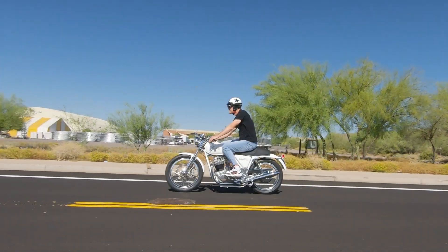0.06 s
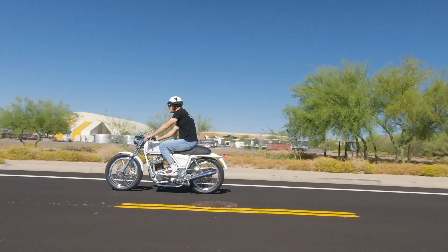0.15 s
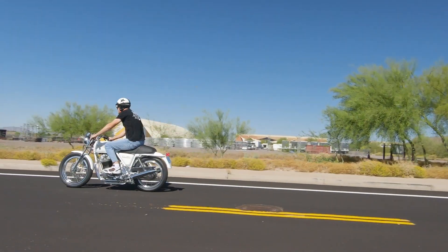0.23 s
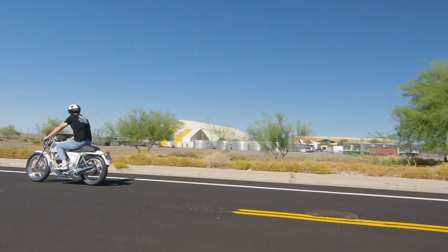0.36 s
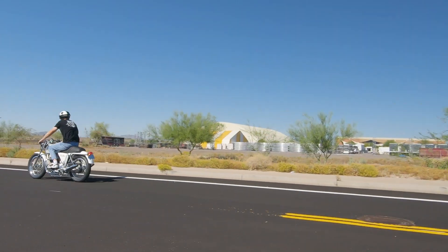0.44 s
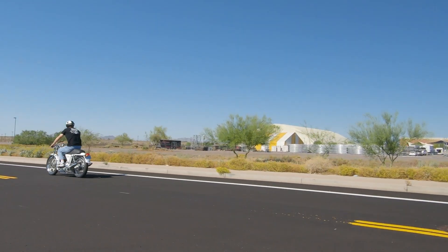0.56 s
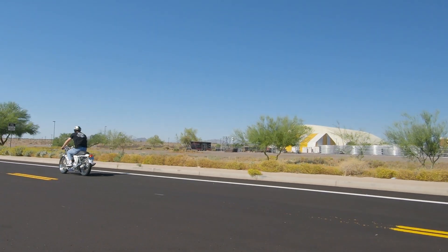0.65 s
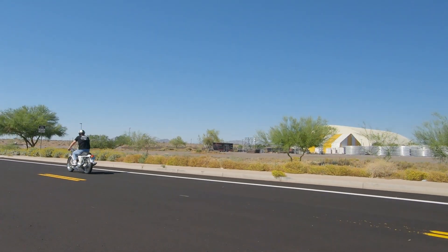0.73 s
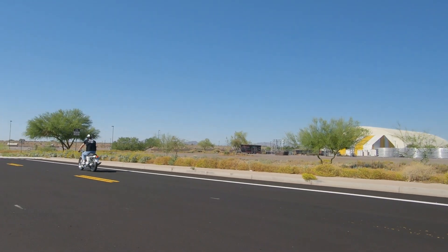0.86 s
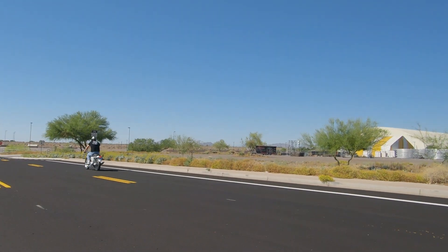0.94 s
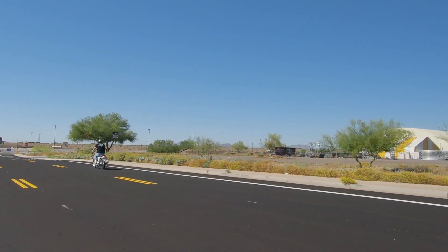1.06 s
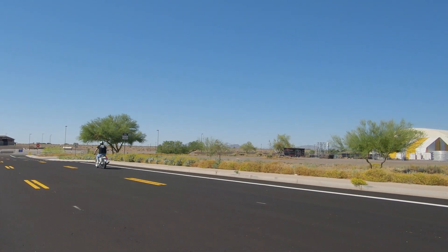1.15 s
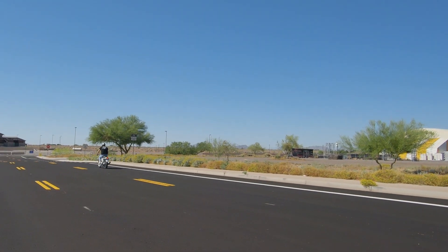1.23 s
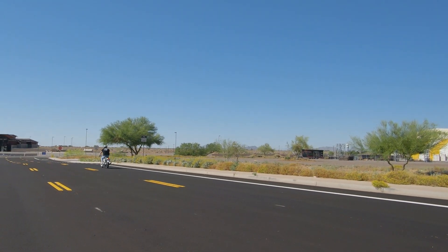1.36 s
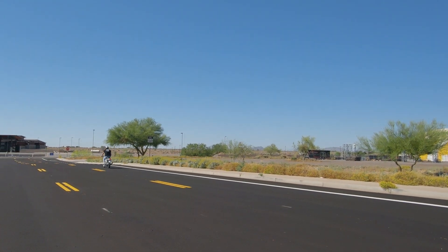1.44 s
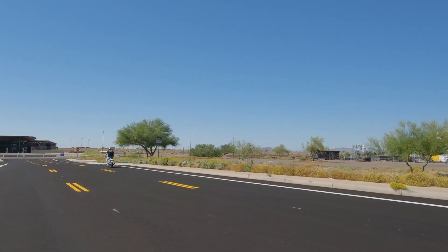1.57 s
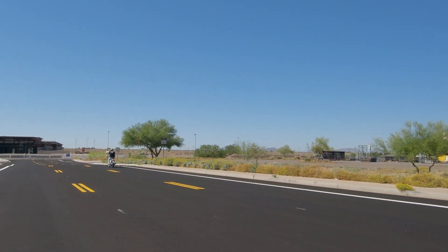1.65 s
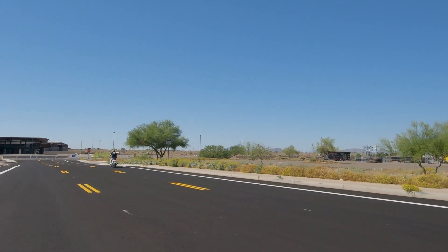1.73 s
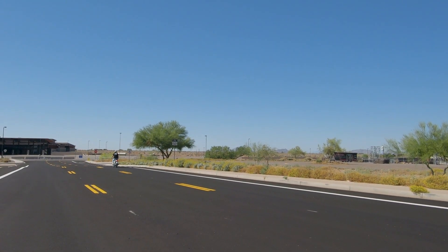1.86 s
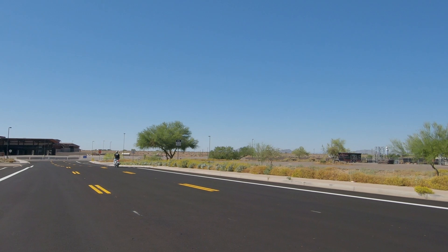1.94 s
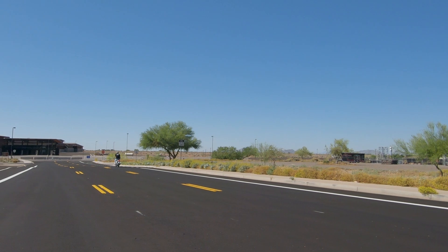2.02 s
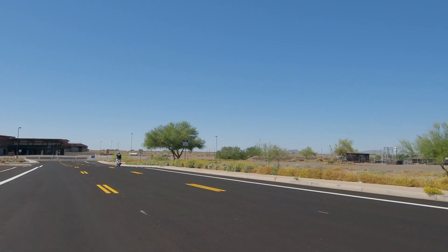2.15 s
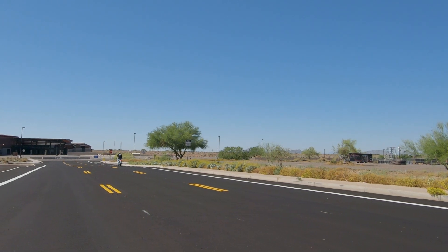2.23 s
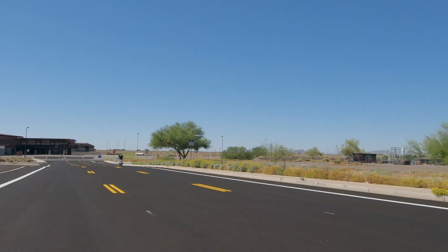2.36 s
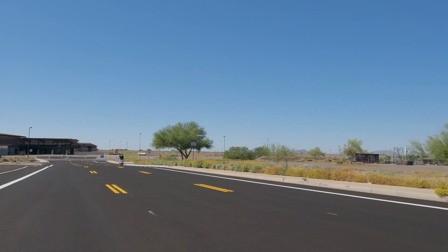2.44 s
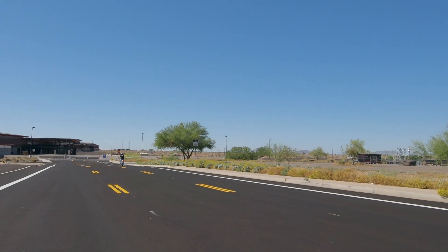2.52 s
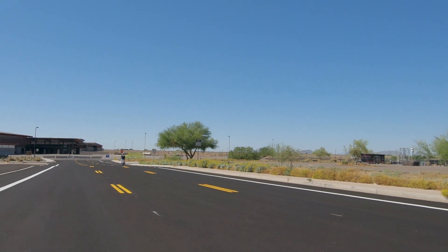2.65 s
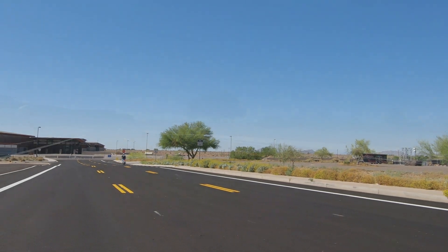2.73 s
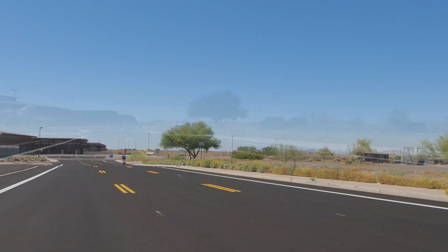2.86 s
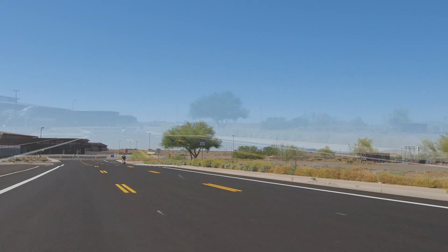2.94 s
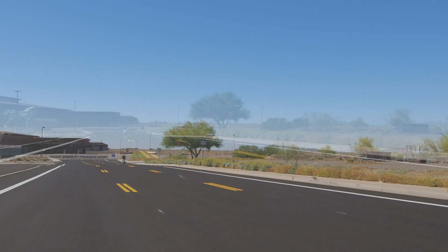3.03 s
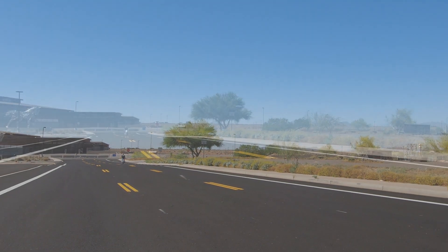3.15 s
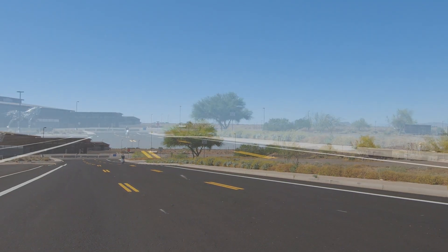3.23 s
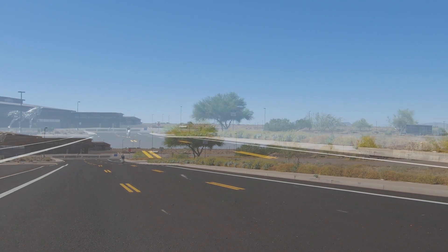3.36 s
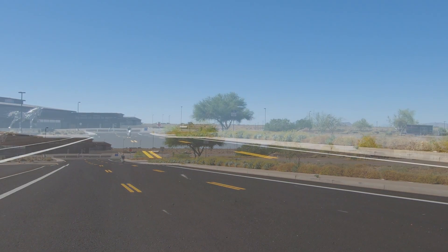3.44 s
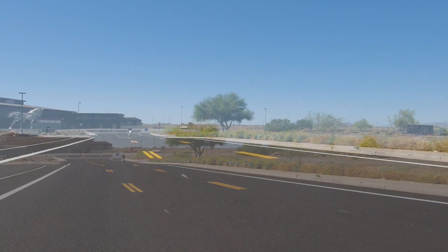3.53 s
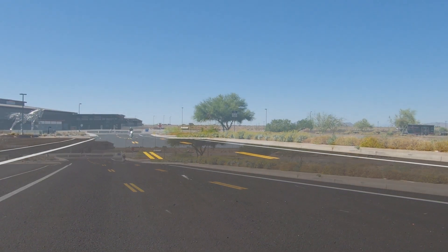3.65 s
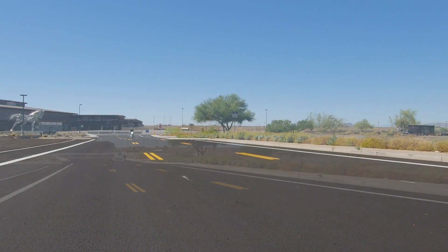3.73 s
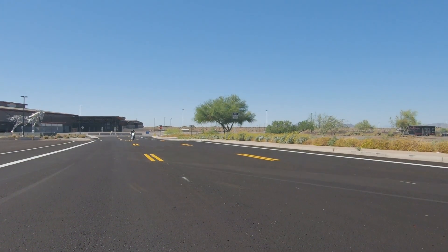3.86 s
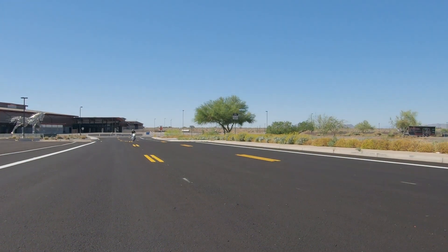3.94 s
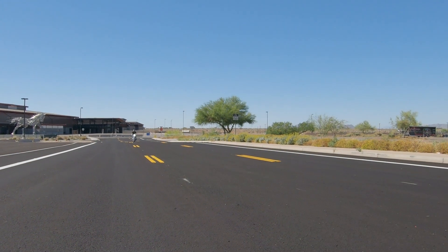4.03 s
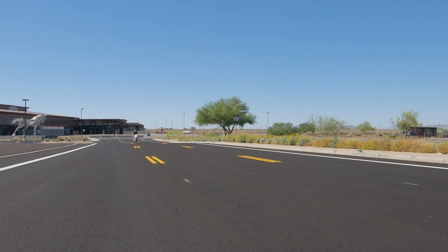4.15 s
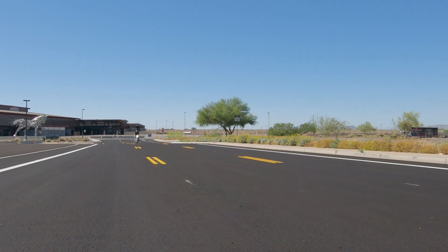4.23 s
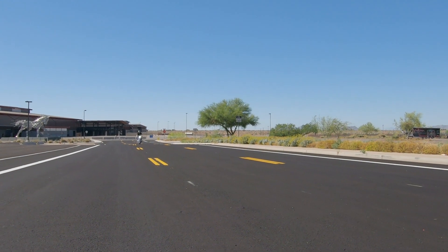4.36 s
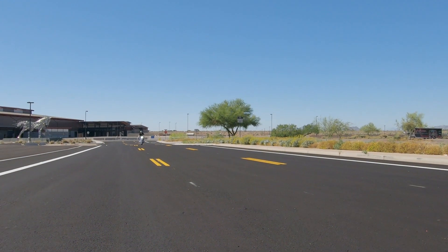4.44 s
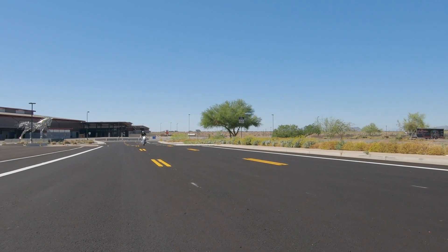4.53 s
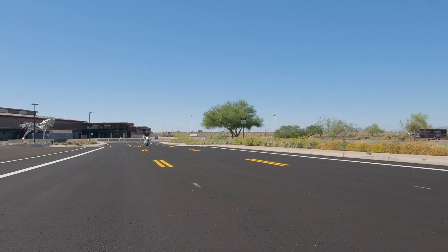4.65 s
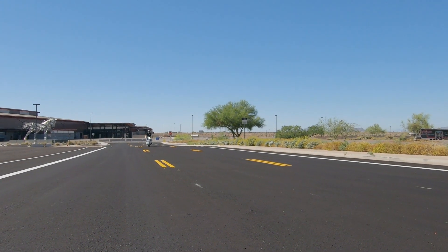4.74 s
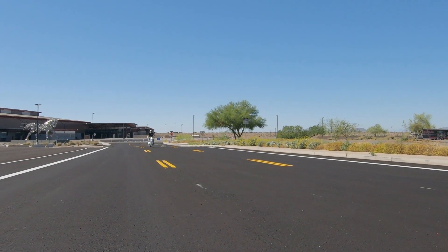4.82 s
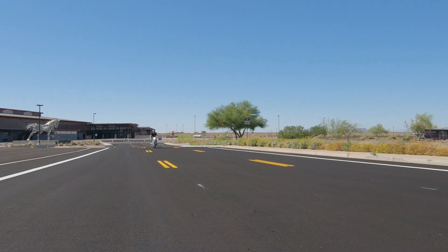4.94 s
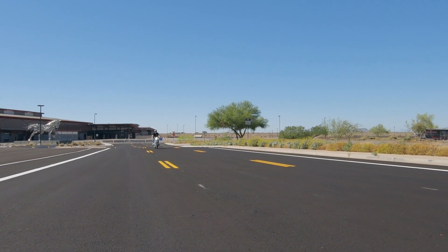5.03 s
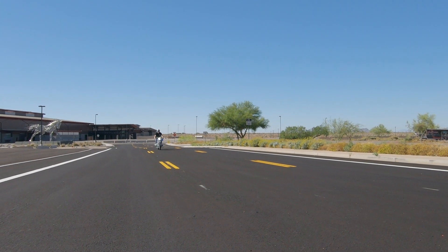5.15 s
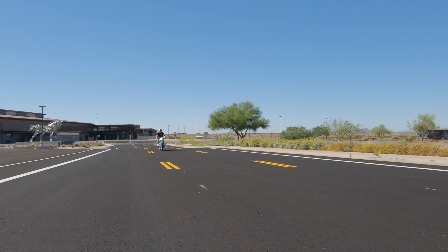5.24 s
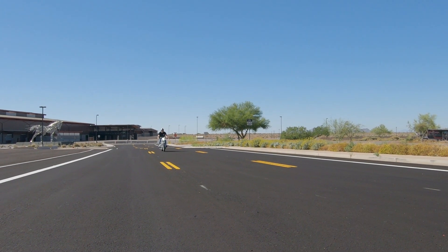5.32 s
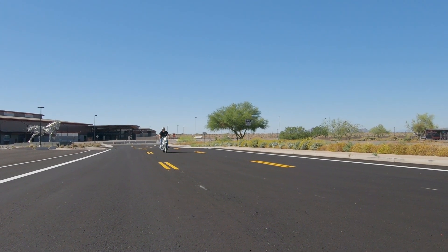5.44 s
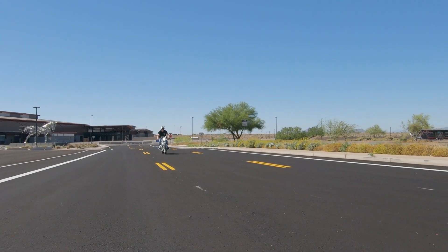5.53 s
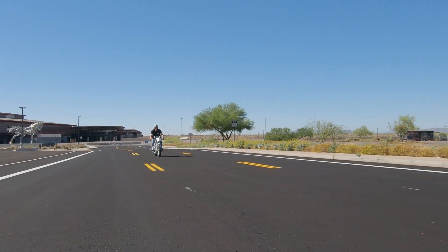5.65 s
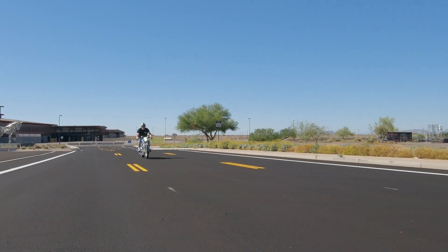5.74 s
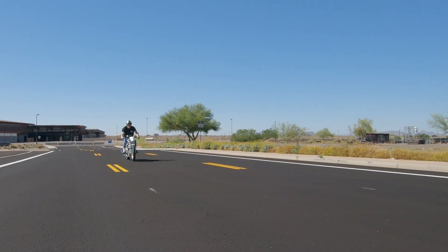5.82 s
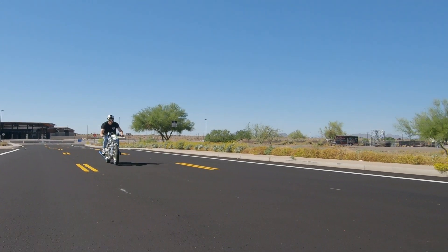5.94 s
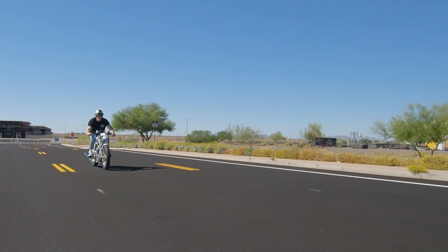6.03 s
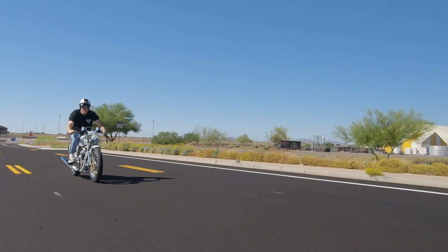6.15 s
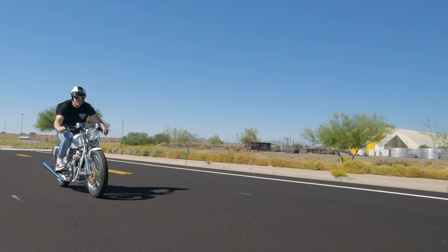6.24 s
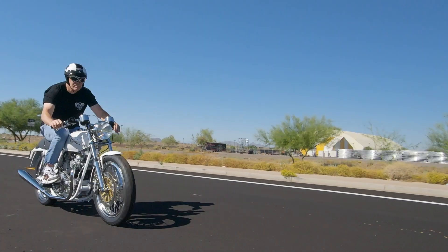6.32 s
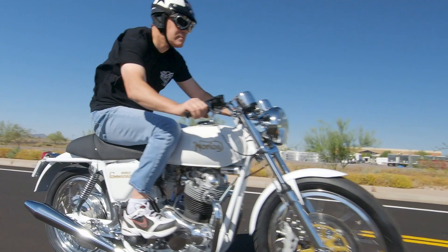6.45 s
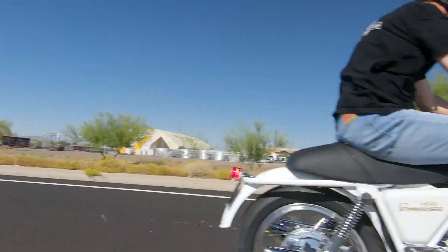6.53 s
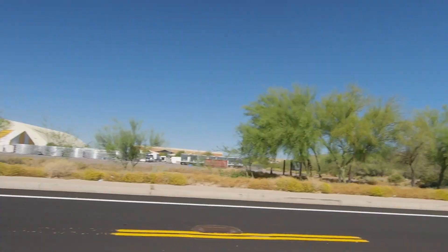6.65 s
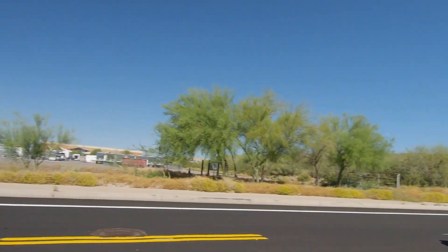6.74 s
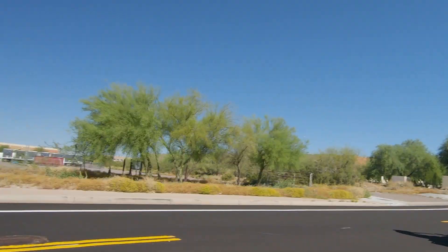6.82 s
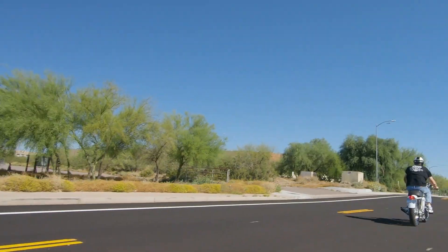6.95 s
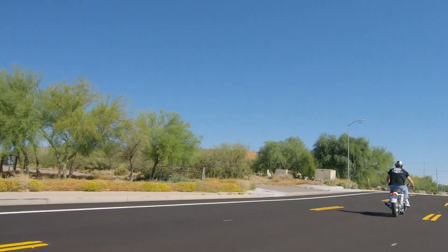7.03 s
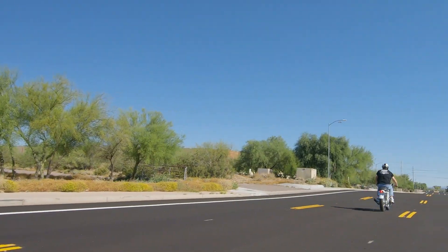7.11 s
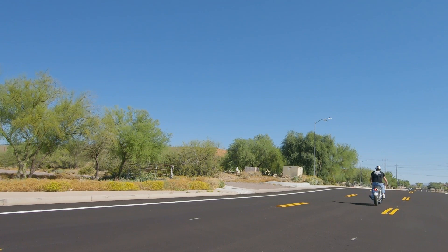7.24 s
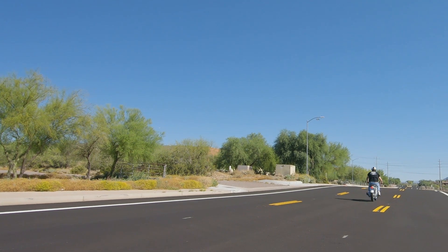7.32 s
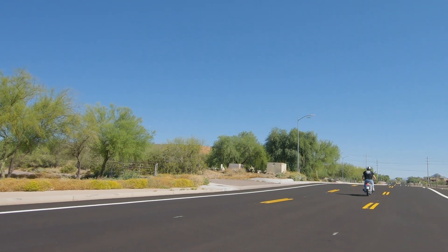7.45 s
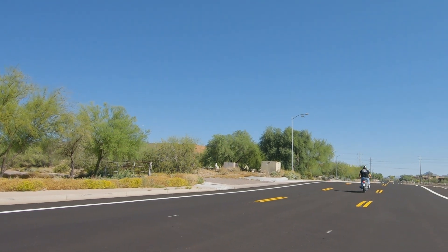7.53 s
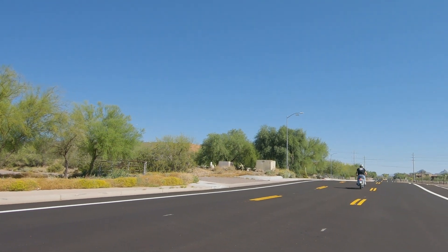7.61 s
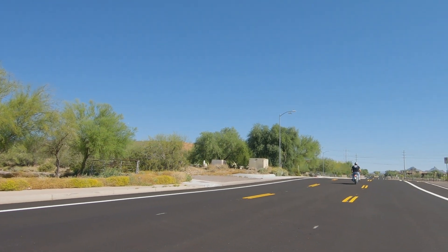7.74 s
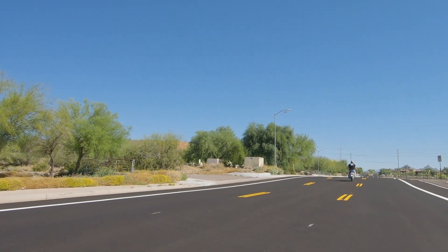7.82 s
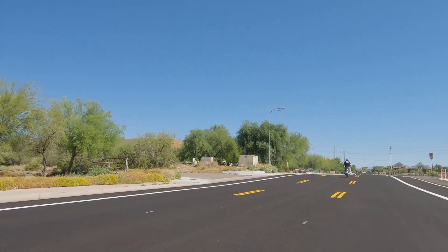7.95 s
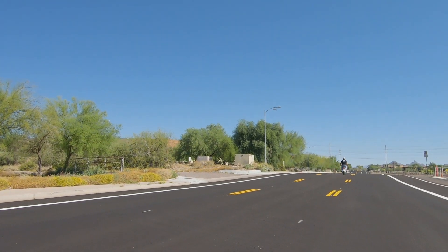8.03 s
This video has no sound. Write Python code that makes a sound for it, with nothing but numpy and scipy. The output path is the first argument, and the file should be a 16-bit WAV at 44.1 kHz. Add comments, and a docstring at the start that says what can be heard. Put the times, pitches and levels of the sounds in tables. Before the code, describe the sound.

A twin-cylinder motorcycle is already passing at 0 s, a raspy open-throttle growl a few metres from the roadside microphone. At about 0.4 s the throttle shuts and it coasts away, a dull, uneven putter quickly thinning, with a small pop at 1.5 s, a cluster of muffled backfires around 1.9-2 s and a brief throttle blip at 2.3-2.6 s. Between 3 and 3.65 s this crossfades into a return run: faint late pops at 3.3 s, then a hard pull with smoothly climbing pitch until 4.8 s. A short gear-change dip follows; from 5 s it pulls again, swelling fast. At 6.6 s it blasts past very close, clipped and tearing, with a thump of wake wind and a Doppler drop. Throttle shuts at 7.1 s, a bang at 7.46 s, then a lower pull recedes to 8 s amid faint open-air hush and light breeze buffeting.

```python
"""A twin-cylinder motorcycle growls past on an open road, shuts its throttle and coasts away, popping.
Its coasting fades into a run back: it pulls hard, changes up, passes close enough to overload the
recorder, changes up again and cruises off. Alternating firings ring through the silencers as the note;
the same firings pulse noise as tearing gas. Late burns bang, and wake and breeze buffet the microphone."""
import sys
import numpy as np
from scipy import signal
from scipy.fft import rfft, irfft, next_fast_len
from scipy.io import wavfile
from scipy.ndimage import uniform_filter1d, map_coordinates

SR = 44100
rng = np.random.default_rng(int(sys.argv[2]) if len(sys.argv) > 2 else 0)


def generate_wav(signal):
    """Clip the signal to [-1, 1] and save it as 16-bit WAV at the path in sys.argv[1]."""
    frames = np.transpose(np.atleast_2d(signal))
    scaled = np.clip(frames, -1, 1) * 32767
    pcm = np.round(scaled).astype(np.int16)
    wavfile.write(sys.argv[1], SR, pcm)


N = 356322
RIDE_M_PER_S, SOUND_M_PER_S = 14, 343

# edges between boom, bark, rasp and fizz [edge_hz]
BAND_EDGES = (300, 2000, 6500)
JET_WIDTH_M, JET_REACH_M = 3.93, 15  # the zone behind the silencers where single blasts stand out
JET_DB = 0.5  # extra level there, weighted by 1.5 less the side-on share
CRACKLE_DEPTH = 0.97  # most that the ticks add to the treble


def motorcycle(distance_m, heading, offset_m):
    """Note and rasp split into four bands, each fading with distance at its own rate."""
    near, far = both_runs()
    throttle = throttle_opening()
    facing = np.clip(heading, 0, 1) ** 2 * 0.79
    # the microphone stands in the jet when close behind the silencers and near their line
    leaving = np.clip(-1.7 * heading, 0, 1)
    jet = throttle * leaving * below(offset_m, JET_WIDTH_M) * below(distance_m, JET_REACH_M)
    abeam = offset_m / distance_m
    note = exhaust_note(near, far, throttle, facing, jet, abeam)
    rush = rasp(near, far, throttle, facing, jet)
    voice = off_the_road(note + amp(-11.5 - facing) * rush, distance_m)
    # the rasp spreads wider in stereo at close range
    centre = rush.mean(axis=0)
    rush = centre + (rush - centre) * amp(5.0 + 18.5 * below(distance_m, 2.4, order=2))
    ticks_heard = CRACKLE_DEPTH * (1 - facing) * (1 - abeam) * (1 - 0.22 * jet)
    ticking = 1 + ticks_heard * crackle(near, far)

    low, middle, high = BAND_EDGES
    boom = even(filtered(voice, lambda hz: below(hz, low, order=5) * (1 - below(hz, 42, order=4))))
    bark = even(filtered(voice, lambda hz: (1 - below(hz, low, order=5)) * below(hz, middle)))
    fizz = even(filtered(rush * ticking, lambda hz: 1 - below(hz, high)))
    tear = even(filtered(rush * ticking ** 0.26, lambda hz: (1 - below(hz, middle)) * below(hz, high)))
    gains = band_gains(throttle, distance_m, heading) * amp(JET_DB * jet * (1.5 - abeam))
    return sum(gain * band for gain, band in zip(gains, (boom, bark, tear, fizz)))


# exhaust note with the throttle open [pitch_hz, level_db]
PULLING_NOTE = [(25, -50), (55, 0), (115, 8), (170, 10), (270, 7), (340, 2), (420, 1), (520, -1.5),
                (630, -11), (830, -5.5), (1200, -21.5), (1600, -16), (2500, -40), (6000, -8.5)]
# exhaust note with the throttle shut [pitch_hz, level_db]
COASTING_NOTE = [(25, -27), (48, -4), (75, -4), (100, 2), (145, -6.5), (250, -6.5), (320, -25.5),
                 (410, -8.5), (540, -49), (750, -29), (1700, -43), (4000, -61)]
# exhaust note heard from the front [pitch_hz, level_db]
ONCOMING_NOTE = [(30, -29), (70, 13.5), (140, 3), (215, 6.5), (310, 3.5), (390, -1), (520, 0), (750, -2.5),
                 (1100, -13.5), (1700, -13.5), (2300, -14.5), (5000, -43)]
FULL_NOTE_AT = 0.57  # throttle opening at which the note is wholly that of pulling
UNEVEN, UNEVEN_ABEAM = 0.11, 0.99  # share of the far pulse returned inverted, outside the jet; more side-on


def exhaust_note(near, far, throttle, facing, jet, abeam):
    """Pulses ring and return in the pipes; throttle and viewing angle blend three resonant notes."""
    uneven = (UNEVEN + UNEVEN_ABEAM * abeam) * (1 - 0.87 * jet)
    train = near + far - filtered(far * uneven, lambda hz: echo(hz, ms=5.37))
    rear = filtered(train, lambda hz: 1 + 0.18 * echo(hz, ms=8.29))
    front_returns = lambda hz: 1 + 0.24 * echo(hz, ms=6.45) - 0.17 * echo(hz, ms=10.2)
    front = filtered(train, lambda hz: front_ring(hz) * front_returns(hz))
    # close behind the silencers the bare pulse is heard, elsewhere the chambers draw it out
    drawn_out = chambers((1 - jet) * rear, lingering=0.22)
    pulling = even(pipe(jet * rear + drawn_out, PULLING_NOTE, swing_hz=463))
    # with the throttle shut, a thin ring rides on the dull note
    thin = filtered(train, lambda hz: 1 + 3 / (1 + 1j * (hz - 1800) / 170))
    coasting = even(pipe(thin, COASTING_NOTE, swing_hz=148))
    oncoming = even(pipe(chambers(front, lingering=1.0), ONCOMING_NOTE, swing_hz=483))
    load = np.clip(throttle / FULL_NOTE_AT, 0, 1)
    behind = even(load * pulling + (1 - load) * coasting)
    scattered = roadside(oncoming[None], t60=0.17)
    return (1 - facing) * behind + facing * (oncoming + amp(-17.0) * scattered)


# gas tearing out of the silencers [pitch_hz, level_db per Hz]
GAS_SPECTRUM = [(200, -5), (400, 14), (620, 8), (800, 8), (1250, 1.5), (1750, 0), (2250, -11.5),
                (2800, -12.5), (3400, -16.5), (3900, -13), (5500, -19), (7700, -35), (10500, -31),
                (12500, -36.5), (15800, -49)]
# the valve gear [pitch_hz, level_db per Hz]
MACHINERY_SPECTRUM = [(150, -47), (250, 14), (342, -41), (406, 0), (537, -30), (800, 1), (872, 7),
                      (1870, -6.5), (2230, -17), (5040, -25), (7380, -50), (11800, -57), (15800, -90)]
CLATTER = 1.36  # valve gear against the blasts, throttle shut and outside the jet
CLATTER_MASKED, CLATTER_JET = 0.34, 1  # shares of it lost at full throttle and inside the jet


def rasp(near, far, throttle, facing, jet):
    """Firings pulse the gas noise, harder from the near pipe, over the clatter of the valve gear."""
    # with the throttle shut, the near pipe burns unevenly and spits
    burn = amp(0.47 * (1 - throttle) * wobble(30))
    blast = even(puffs(burn * near + 0.5 * far, life_ms=3.06, return_ms=8.2, returned=0.15))
    taps = (near + far) * amp(3.0 * wobble(60))
    double_taps = filtered(taps, lambda hz: echo(hz, ms=4.9) + 1.8 * echo(hz, ms=14))
    tappets = even(puffs(double_taps, life_ms=1, return_ms=4.6, returned=1.0))
    clatter = CLATTER * (1 - CLATTER_MASKED * throttle) * (1 - CLATTER_JET * jet)
    gas = noise(GAS_SPECTRUM, side_db=-30) * (blast ** 0.74 + clatter * (0.5 * tappets + 0.78))
    machinery = noise(MACHINERY_SPECTRUM, side_db=-25.5) * (3.2 + 0.18 * tappets + 0.031 * blast)
    # the cooling fins sing towards the front
    fins = filtered(machinery, lambda hz: 1 + 2.1 / (1 + 1j * (hz - 2790) / 70))
    return (1 - facing) * even(gas) + facing * even(fins)


CRACKLE_FAR, CRACKLE_SCATTER_DB = 0.38, 1.5  # the far cylinder's share; spread of the tick sizes


def crackle(near, far):
    """Each firing brings a sharp tick of random size and a weaker one after it."""
    ticks = (near + CRACKLE_FAR * far) * amp(CRACKLE_SCATTER_DB * wobble(77))
    late_ticks = filtered(ticks, lambda hz: echo(hz, ms=2.2))
    return even(puffs(late_ticks, life_ms=0.88, return_ms=7.2, returned=0.36))


# engine speed on the run away, before Doppler [time_s, firings_per_s]
AWAY_SPEED = [(0, 54.2), (.393, 52.5), (.503, 49), (.732, 50.35), (1.881, 44.95), (2.023, 51.34),
              (2.171, 45.66), (2.3, 50.54), (2.5, 50.5), (3.095, 46.72)]
# engine speed on the run back, before Doppler [time_s, firings_per_s]
RETURN_SPEED = [(2.981, 47.684), (4.148, 68.117), (4.76, 77.918), (4.86, 68.726), (5.042, 55.813),
                (5.694, 62.345), (6.445, 68.766), (7.11, 69.701), (7.171, 65.697), (7.431, 50.269),
                (7.575, 56.904), (8.08, 55.919)]
# the run away and the run back [passing_s, closest_m]
RUN_PATHS = [(0.2, 4), (6.62, 1.8)]


def both_runs():
    """The firings of the run away dissolve into those of the run back, near and far pipe apart."""
    away = firings(AWAY_SPEED, RUN_PATHS[0], far_db=-2.5, far_lag_ms=0.9, scatter_db=1.43, jitter_ms=0.22)
    toward = firings(RETURN_SPEED, RUN_PATHS[1], far_db=-2.3, far_lag_ms=0.12,
                     scatter_db=0.7, jitter_ms=0.035)
    return dissolve(away, toward)


def firings(speed, run, far_db, far_lag_ms, scatter_db, jitter_ms):
    """The cylinders fire in turn, Doppler-shifted: a train for the near pipe and one for the far."""
    heading = ride(run)[1]
    doppler = 1 / (1 - heading * RIDE_M_PER_S / SOUND_M_PER_S)
    fired = np.cumsum(curve(speed) * doppler) / SR
    times = np.interp(np.arange(int(fired[-1])), fired, np.arange(N) / SR)
    chance = rng.standard_normal((len(times), 2))
    far = 1 - np.arange(len(times)) % 2
    times = times + (far * far_lag_ms + jitter_ms * chance[:, 0]) / 1000
    sizes = amp(far * far_db + scatter_db * chance[:, 1])
    return np.array([spikes(times, sizes * (1 - far)), spikes(times, sizes * far)])


# throttle pulls [open_s, shut_s, first_opening 0-1, last_opening 0-1]
THROTTLE_PULLS = [(-.05, 0.401, 0.57, 0.57), (2.286, 2.59, 0.13, 0.23), (3.275, 4.788, 0.83, 1),
                  (5.002, 7.106, 0.83, 0.98), (7.555, 8.15, 0.39, 0.8)]
TWIST_S = 0.0067  # time to open or shut it


def throttle_opening():
    """Each pull snaps the throttle open, moves it steadily and snaps it shut."""
    t = np.arange(N) / SR
    total = np.zeros(N)
    for on, off, first, last in THROTTLE_PULLS:
        held_open = np.clip(np.minimum(t - on, off - t) / TWIST_S + 0.5, 0, 1)
        total += np.interp(t, (on, off), (first, last)) * held_open
    return np.clip(total, 0, 1)


# boom, bark, rasp and fizz, at the reference distance and firing rate [coasting_behind_db,
# added_by_throttle_db, added_in_front_db, added_by_throttle_in_front_db,
# added_db per octave of engine speed, lost_db per tenfold distance]
BAND_LEVELS = [(-24, 7.5, -2, -2.1, 0.5, 21.5), (-29, 9, -0.43, 6, 12, 21),
               (-45.5, 14, 3.95, 1.5, 10.5, 33.5), (-52, 17.5, -4.5, 7.5, -2, 37.5)]
# the engine goes slack and the level dips briefly [centre_s, half_length_s, change_db]
SLACK_MOMENTS = [(1.84, 0.026, -6.5), (2.17, 0.07, -2), (2.59, 0.012, -3.5), (2.88, 0.028, -6),
                 (7.53, 0.027, -3)]
# the treble swells, or its fizz dips [centre_s, half_length_s, rasp_change_db, fizz_change_db]
TREBLE_SWELLS = [(0.867, 0.17, 7, 1.5), (1.463, 0.76, 7, 6), (2.4, 0.34, 5.5, -6), (3.84, 0.41, 8, -20),
                 (5.67, 0.32, 4.5, 5.5), (7.27, .11, 9, 12)]
REFERENCE_M, REFERENCE_RATE = 10, 60  # metres; firings per s


def band_gains(throttle, distance_m, heading):
    """Each band follows throttle and engine speed, turns with the machine and fades with distance."""
    front = (1 + heading) / 2
    rate = dissolve(curve(AWAY_SPEED), curve(RETURN_SPEED))
    octaves = np.log2(rate / REFERENCE_RATE)
    decades = np.log10(distance_m / REFERENCE_M)
    slack_db = bumps(SLACK_MOMENTS)
    levels_db = []
    for coast_db, pull_db, front_db, front_pull_db, rev_db, loss_db in BAND_LEVELS:
        behind_part_db = (1 - front) * throttle * pull_db
        front_part_db = front * (front_db + throttle * front_pull_db)
        level_db = coast_db + slack_db + behind_part_db + front_part_db
        levels_db.append(level_db + rev_db * octaves - loss_db * decades)
    boom_db, bark_db, rasp_db, fizz_db = levels_db
    rasp_db = rasp_db + bumps([(s, half, db) for s, half, db, _ in TREBLE_SWELLS])
    fizz_db = fizz_db + bumps([(s, half, db) for s, half, _, db in TREBLE_SWELLS])
    return amp([boom_db, bark_db, rasp_db, fizz_db])


# chambers of the silencers [pitch_hz, width_hz at a lingering of 1]
SILENCER_CHAMBERS = [(330, 64.5), (540, 116), (800, 81), (1400, 220)]


def chambers(train, lingering):
    """Each chamber holds back the sound near its own pitch, drawing a pulse out into a growl."""
    def held(hz, centre, width):
        real, imaginary = centre * centre - hz * hz, 1j * hz * width
        return (real - imaginary) / (real + imaginary)
    return filtered(train, lambda hz: np.prod(
        [held(hz, centre, width / lingering) for centre, width in SILENCER_CHAMBERS], axis=0))


# resonances of the growl heard from the front [pitch_hz, half_width_hz, gain]
FRONT_RESONANCES = [(370, 34, 0.74), (541, 23, 1.23), (1600, 240, 0.48)]


def front_ring(hz):
    """Fixed resonances lift each harmonic of the oncoming note as it climbs through them."""
    return 1 + sum(gain / (1 + 1j * (hz - centre) / width) for centre, width, gain in FRONT_RESONANCES)


def pipe(train, note, swing_hz):
    """Pulses ring through the silencer, an all-pass making each swing first down and then up."""
    return filtered(train, lambda hz: causal(shape(note, hz)) * (swing_hz - 1j * hz) / (swing_hz + 1j * hz))


def puffs(train, life_ms, return_ms, returned):
    """Each impulse opens a dying puff, and another when it has run the pipe again."""
    fall = lambda hz: 1 / (1 + 2j * np.pi * hz * life_ms / 1000) / (1 + 1j * hz / 900)
    return np.abs(filtered(train, lambda hz: fall(hz) * (1 + returned * echo(hz, return_ms))))


# late burns in the pipes, scaled together when played [start_s, level_db, spit_level_db under the bang]
LATE_BURNS = [(1.518, -21, -22), (1.905, -25, -31), (1.928, -11.5, -21), (1.95, -16, -31),
              (1.972, -13.5, -29), (3.304, -19, -34), (3.325, -21, -34), (7.46, -9, -29)]
# tone of a late burn [pitch_hz, level_db]
BANG_NOTE = [(30, -7), (120, 11.5), (280, -0.5), (420, 5.5), (600, -8), (1200, -29), (1800, -37),
             (4000, -42)]


def pops():
    """Unburnt mixture bangs in the pipe: a dull pulse and a spit of gas."""
    times, db, spit_db = np.transpose(LATE_BURNS)
    thump = pipe(chambers(spikes(times, amp(db)), lingering=0.41), BANG_NOTE, swing_hz=493)
    spit = puffs(spikes(times, amp(db + spit_db)), life_ms=3.0, return_ms=7.6, returned=0.46)
    hiss = unit(filtered(noise(GAS_SPECTRUM, side_db=-25), lambda hz: 1 - below(hz, 1700, order=2)))
    bang = amp(db.max() - 1.5) * thump / np.abs(thump).max()
    return bang + amp((db + spit_db).max() + 7) * hiss * spit / spit.max()


PIPE_HEIGHT_M, MIC_HEIGHT_M, ROAD_BOUNCE = 0.27, 0.84, 0.17  # the last: share the asphalt reflects


def off_the_road(x, distance_m):
    """The asphalt's copy lags more as the machine comes near, sweeping a notch through the note."""
    bounced_m = np.hypot(distance_m, MIC_HEIGHT_M + PIPE_HEIGHT_M)
    direct_m = np.hypot(distance_m, MIC_HEIGHT_M - PIPE_HEIGHT_M)
    t = np.arange(N) / SR
    lag_s = (bounced_m - direct_m) / SOUND_M_PER_S
    bounced = np.array([np.interp(t - lag_s, t, side) for side in x])
    return (x + ROAD_BOUNCE * bounced) / np.hypot(1, ROAD_BOUNCE)


def roadside(x, t60):
    """Kerbs, brush and buildings scatter a short dull tail to each side, at the level of x."""
    t = np.arange(SR // 4) / SR
    dull = signal.lfilter([1], [1, -0.7], rng.standard_normal((2, len(t))))
    wet = signal.fftconvolve(x, dull * amp(-60 * t / t60), axes=1)[:, :N]
    return unit(wet) * np.std(x)


def ride(run):
    """A straight ride past: distance, heading (1 oncoming, -1 leaving) and offset from its line."""
    pass_s, offset_m = run
    ahead_m = RIDE_M_PER_S * (pass_s - np.arange(N) / SR)
    distance_m = np.hypot(offset_m, ahead_m)
    return np.array([distance_m, ahead_m / distance_m, np.full(N, offset_m)])


# the run away fades into the run back [start_s, end_s]
DISSOLVE_SPAN = (3.02, 3.65)


def dissolve(away, back):
    """A linear fade from the run away to the run back."""
    share = np.interp(np.arange(N) / SR, DISSOLVE_SPAN, (0, 1))
    return (1 - share) * away + share * back


# wake and breeze striking the microphone ports [peak_s, level_db before flutter, rise_db per s, fall_db per s]
WIND_GUSTS = [(.3, -25, 20, 15), (1.76, -38, 120, 150), (6.58, -11.5, 167, 59), (7.95, -20, 47, 12)]
# low rumble of a gust [pitch_hz, level_db per Hz]
RUMBLE_SPECTRUM = [(10, -6.5), (28, -28), (55, -17), (100, -19), (250, -35), (900, -96)]
# hush of open country [pitch_hz, level_db per Hz]
AIR_SPECTRUM = [(30, -3), (150, 0.5), (600, -9), (1500, -26), (4000, -31.5), (9000, -54), (16000, -83)]


def wind():
    """Lumps of air on the ports, as fluttering low noise, over the faint hush of open country."""
    t = np.arange(N) / SR
    gusts = np.zeros(N)
    for s, db, rise_db, fall_db in WIND_GUSTS:
        gusts += amp(db - np.maximum(rise_db * (s - t), fall_db * (t - s)))
    buffet = gusts * even(noise(RUMBLE_SPECTRUM, side_db=-11.5)) * amp(-0.5 + 0.5 * wobble(36))
    return buffet + amp(-44) * noise(AIR_SPECTRUM, side_db=-12)


def amp(db):
    """Decibels to gain."""
    return 10 ** (np.asarray(db) / 20)


def unit(x):
    """Scale to rms 1."""
    return x / np.sqrt(np.mean(x ** 2) + 1e-20)


def even(x):
    """Scale to a running rms of 1, keeping the single beats."""
    power = np.mean(np.atleast_2d(x) ** 2, axis=0)
    power = uniform_filter1d(uniform_filter1d(power, size=3600), size=2600)
    return x / np.sqrt(np.abs(power) + 1e-14)


def curve(rows):
    """Straight lines through (time, value) rows, one value per sample."""
    s, values = np.transpose(rows)
    return np.interp(np.arange(N) / SR, s, values)


def bumps(rows):
    """A sum of bell-shaped swells (s, half length s, height)."""
    t = np.arange(N) / SR
    return sum(height * np.exp(-((t - s) / half) ** 2) for s, half, height in rows)


def wobble(rate):
    """A smooth random curve, rate knots a second."""
    knots = rng.standard_normal(int(N * rate / SR) + 4)
    return map_coordinates(knots, [np.arange(N) * rate / SR])


def spikes(times, sizes):
    """Impulses at the given times."""
    return np.bincount(np.clip(np.round(times * SR).astype(int), 0, N), sizes, N + 1)[:N]


def noise(spectrum, side_db):
    """Coloured stereo noise of rms 1, wider in the treble."""
    mid, side = filtered(rng.standard_normal((2, N)), lambda hz: shape(spectrum, hz))
    side = amp(side_db) * filtered(side, lambda hz: np.hypot(1, hz / 5000))
    return unit(np.array([mid + side, mid - side]))


def filtered(x, response):
    """x filtered by a complex response of frequency, zero-padded so that tails do not wrap."""
    m = 2 * next_fast_len(N // 2 + SR // 8, True)
    return irfft(rfft(x, m) * response(np.fft.rfftfreq(m, 1 / SR)), m)[..., :N]


def shape(points, hz):
    """Gain through (Hz, dB) points on a log axis."""
    f, db = np.transpose(points)
    return amp(np.interp(np.log(hz + 1), np.log(f), db))


def causal(gain):
    """The minimum-phase response with this gain: it rings only after its cause."""
    cepstrum = irfft(np.log(np.maximum(gain, 1e-6)))
    half = len(cepstrum) // 2
    return np.exp(rfft(np.r_[cepstrum[0], 2 * cepstrum[1:half], np.zeros(half)]))


def below(value, edge, order=8):
    """A smooth fall from 1 to 0 past an edge, in frequency or in metres."""
    return 1 / (1 + (value / edge) ** order)


def echo(hz, ms):
    """The response of a delay."""
    return np.exp(-2j * np.pi * hz * ms / 1000)


# left-right level difference while oncoming, reversed when leaving [run_away_db, run_back_db]
PAN_SWING = (-0.4, 1.13)


def scene():
    """The machine moves across the stereo field above the wind."""
    distance_m, heading, offset_m = dissolve(ride(RUN_PATHS[0]), ride(RUN_PATHS[1]))
    bike = motorcycle(distance_m, heading, offset_m) + pops()
    pan_db = dissolve(*PAN_SWING) * heading
    bike_in_place = bike + amp(-17.5) * roadside(bike, t60=0.11)
    return bike_in_place * amp([pan_db / 2, -pan_db / 2]) + wind()


def record(dry):
    """The recorder clips with a rounded knee at full scale, then cuts all above its band limit."""
    clipped = dry / (1 + np.abs(dry) ** 12) ** (1 / 12)
    return filtered(clipped, lambda hz: hz < 15950)


dry = scene()
out = record(dry)
generate_wav(out)
```